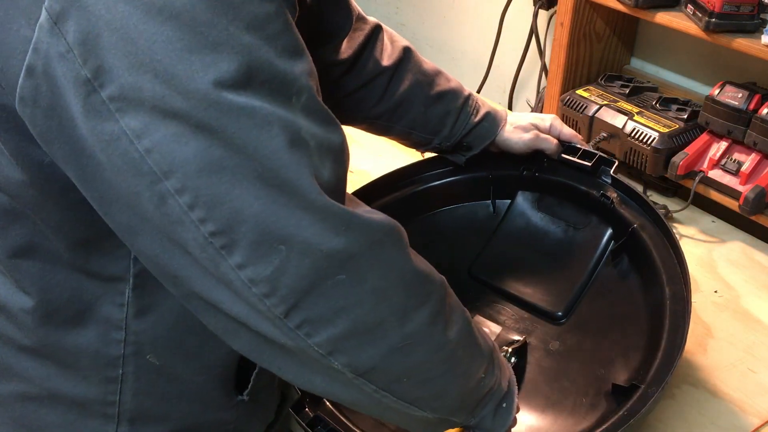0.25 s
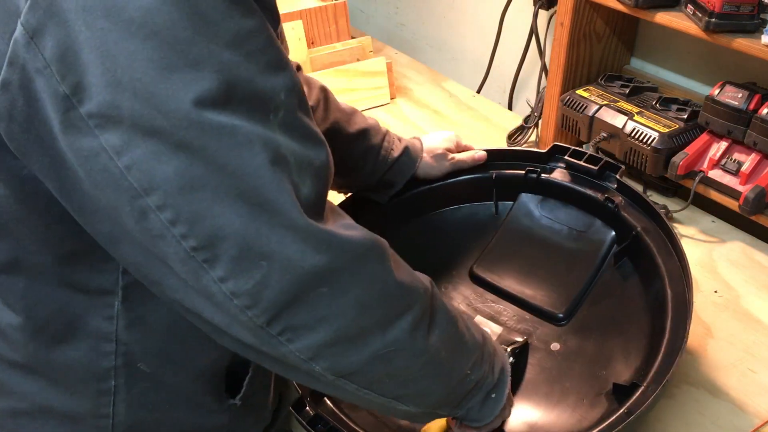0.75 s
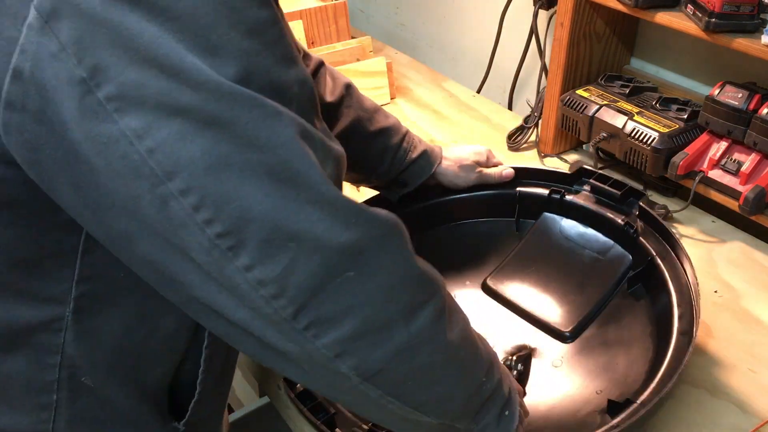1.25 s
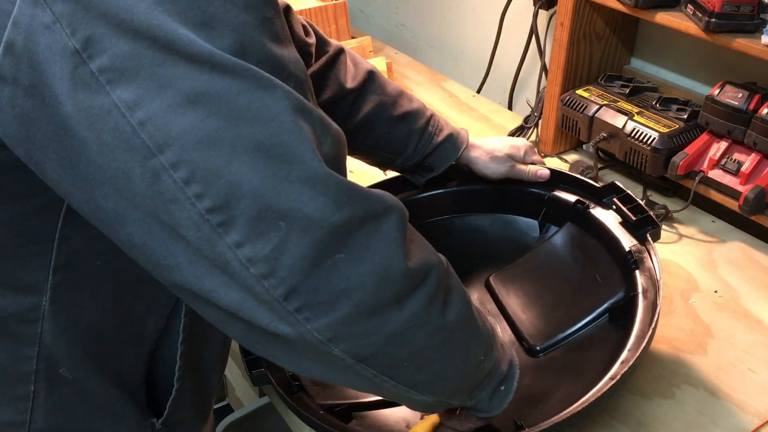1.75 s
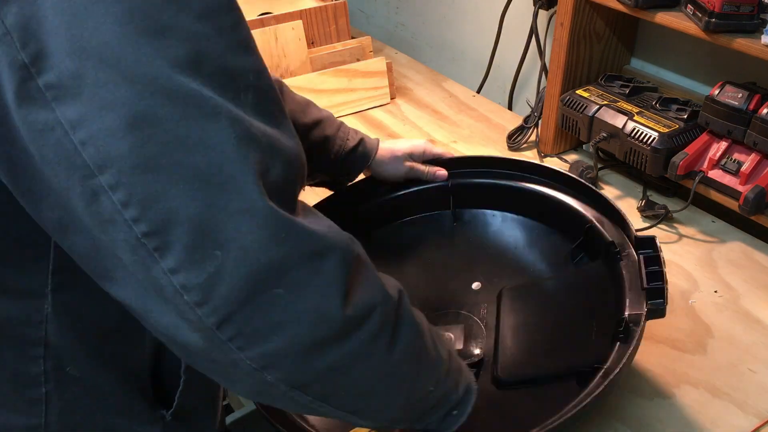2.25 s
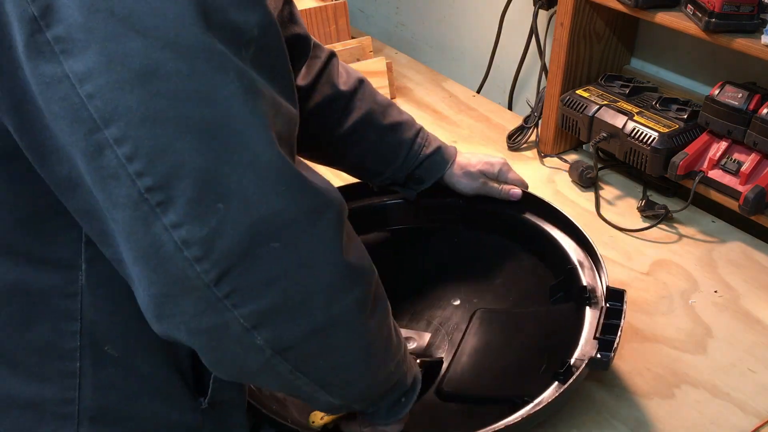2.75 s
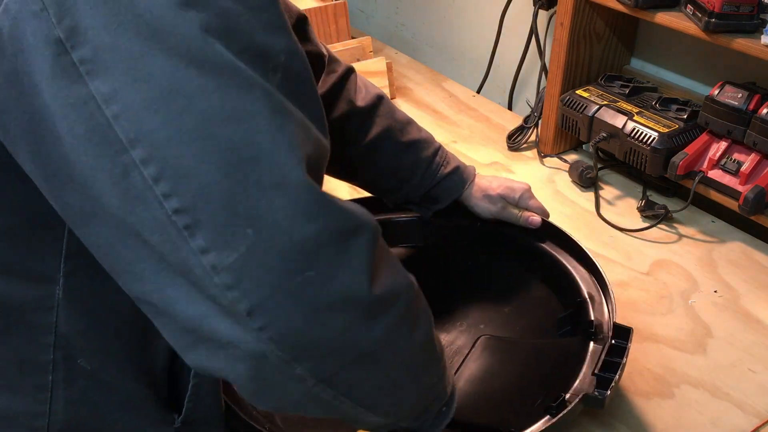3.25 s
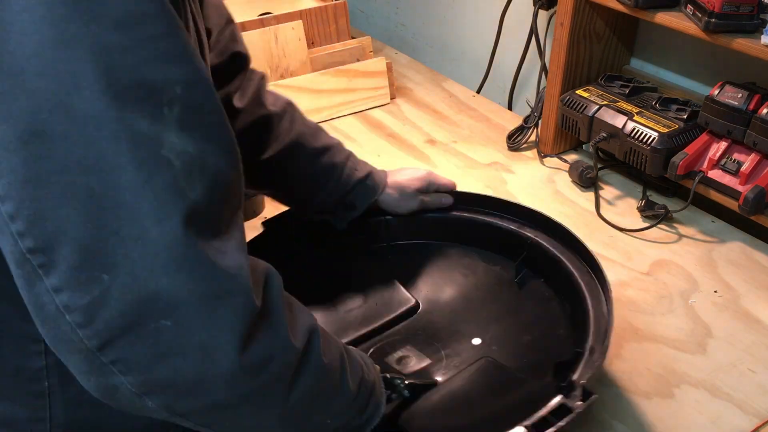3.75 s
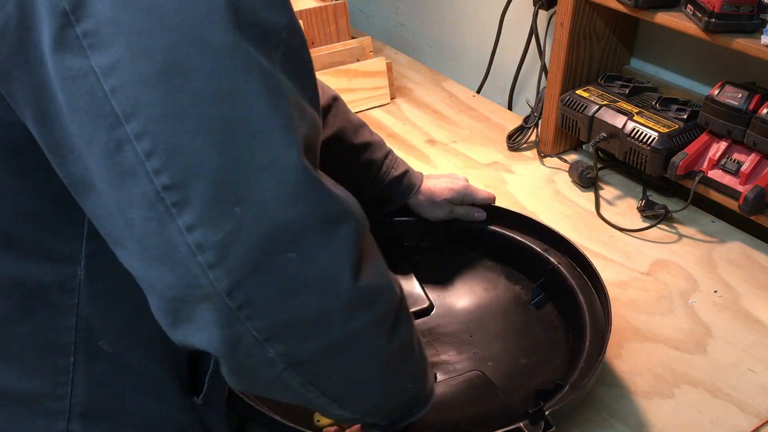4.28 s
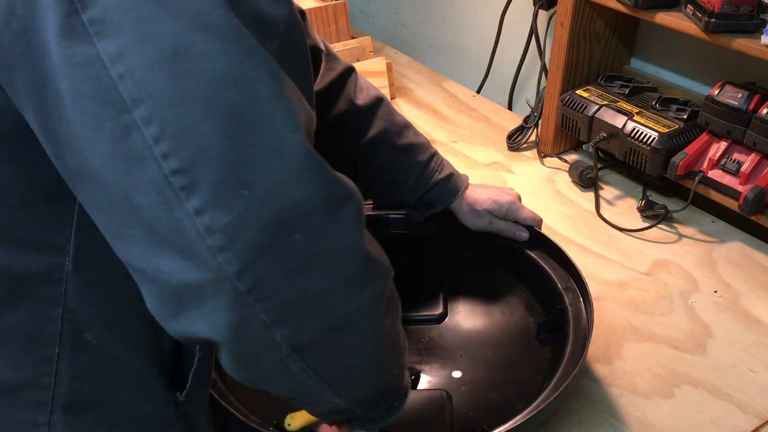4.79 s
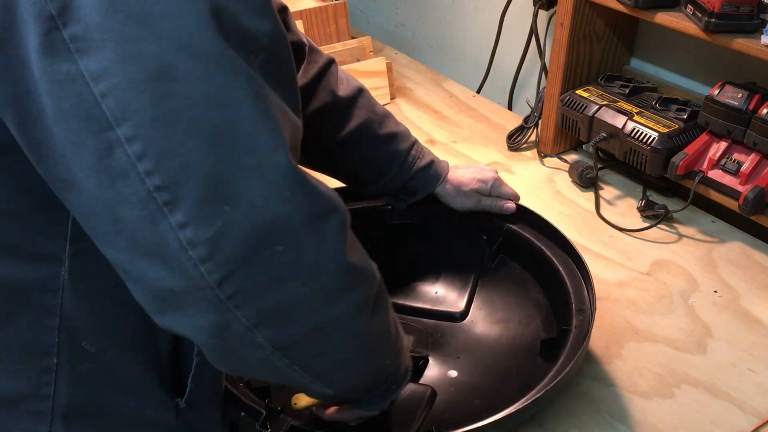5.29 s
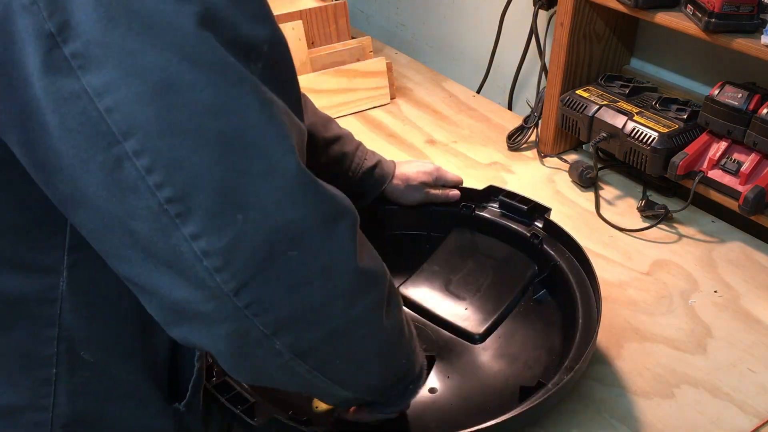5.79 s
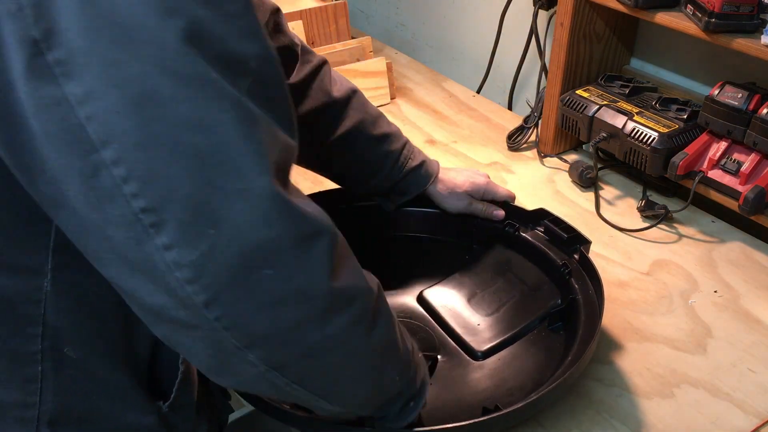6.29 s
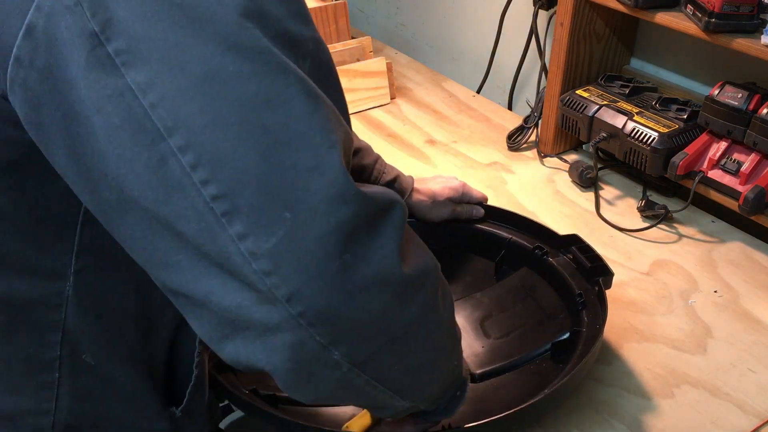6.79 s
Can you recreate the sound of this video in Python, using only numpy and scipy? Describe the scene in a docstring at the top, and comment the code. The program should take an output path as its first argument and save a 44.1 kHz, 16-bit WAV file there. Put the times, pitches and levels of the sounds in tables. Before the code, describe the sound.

In a quiet workshop with a low hum, a hand rubs and knocks a big hollow plastic lid on a bench for about a second. Then everything jumps to fast motion: the room hum rises in pitch, and metal snips bite through plastic in rapid, uneven cracks and ticks with gritty scraping between and dull, short lid booms. Close, dry microphone with little bass.

```python
"""A workshop hums while a hand drags and knocks a large plastic lid on a plywood bench.
Then the playback jumps to fast motion: room noise and hum are read faster, so they rise in pitch.
Metal snips bite through the lid: bursts of noise ring blades and plastic, and a late push booms the lid.
Between bites, grainy noise grinds and scrapes, with small ticks and faint crackles.
The pitches of the cutting rings are written as heard in fast motion."""
import sys
import numpy as np
from scipy import signal
from scipy.fft import rfft, irfft, next_fast_len
from scipy.io import wavfile
from scipy.ndimage import uniform_filter1d

SR = 44100
rng = np.random.default_rng(int(sys.argv[2]) if len(sys.argv) > 2 else 0)


def transcribe(signal):
    """Save signal, clipped to [-1, 1], as a 16-bit WAV file at the path in sys.argv[1]."""
    frames = np.atleast_2d(signal).T
    limited = np.clip(frames, -1, 1)
    pcm = np.round(limited * 32767).astype(np.int16)
    wavfile.write(sys.argv[1], SR, pcm)


def makeup_ratio(level_db):
    """Linear amplitude ratio for a level in decibels (20 dB per factor of ten)."""
    decades = np.asarray(level_db, float) / 20
    return 10 ** decades


N = 310023  # length in samples

FAST_FROM_S, FAST_SPEED = 1.128, 5.73  # when fast motion starts, and how many times faster it is
STRAIN_S = 0.003  # faint crackle before the cut lets go

# Rubbing sound of skin and sleeve on plastic: pitch_hz [Hz], level_db [dB per Hz, relative]
SLIDE_HISS = [(1180, -6), (2000, 1.5), (3840, 5.5), (5100, 2.5), (6880, -1.5), (9000, -0.5), (12000, -1),
              (15900, -7), (16500, -53)]
# Rubbing and knocking as heard through the lid body: pitch_hz [Hz], level_db [dB per Hz, relative]
LID_BODY = [(150, -34), (300, 16.5), (450, 8.5), (1000, 4), (1600, 1.5), (2500, -10), (4000, -67)]
# Bites that boom the whole lid, with levels ahead of the microphone: start_s [s], crack_db [dB peak, lower half],
# ring_hz [Hz, strongest ring before small shifts], tear_ms [ms], plate_db [dB peak], boom_db [dB peak]
BITES = [(1.1508, -32.5, 4350, 4.4, -33, -44), (1.2121, -47.5, 2540, 3.7, -50, -41),
         (1.3185, -27, 3230, 2.8, -37.5, -36.5), (1.3489, -39, 3120, 4.6, -52, -39),
         (1.522, -28.5, 5900, 0.96, -39, -30.5), (1.735, -35, 5970, 4, -37, -36),
         (1.7621, -38, 2460, 4.2, -35, -40.5), (1.8957, -36, 6100, 4.5, -36, -36.5),
         (2.2771, -38.5, 5970, 3.2, -41, -35), (2.4842, -30.5, 2880, 2.7, -31.5, -33.5),
         (2.85, -25.5, 3170, 2.4, -31.5, -29.5), (3.0228, -43, 3150, 3.9, -35.5, -44),
         (3.1396, -25, 2830, 1.65, -28.5, -34), (3.1877, -24, 4100, 4.1, -23.5, -24.5),
         (3.4229, -17, 3300, 2.3, -29, -20), (3.739, -31, 4020, 5.5, -35.5, -29),
         (3.772, -37.5, 3610, 7.4, -43, -40), (3.8494, -39.5, 4860, 5.2, -38, -45),
         (4.1137, -32, 2230, 5.3, -31.5, -30), (4.3101, -22.5, 4040, 2.6, -32.5, -23.5),
         (4.505, -26.5, 5420, 3.5, -34.5, -30), (4.794, -27.5, 2230, 3.4, -33.5, -30.5),
         (4.9507, -24, 6660, 3.54, -26.5, -24.5), (5.0107, -41, 2420, 4.1, -46, -38),
         (5.1786, -43, 5100, 6, -43.5, -35.5), (5.3101, -29, 3880, 4.7, -27, -21),
         (5.421, -37, 4270, 1.7, -50, -26.5), (5.5533, -32, 6900, 4.2, -35, -27.5),
         (5.677, -34, 5340, 5, -36, -29), (5.897, -36, 4020, 2.1, -34, -30.5),
         (6.02, -34, 7650, 4.6, -33.5, -27), (6.195, -38, 3050, 5.8, -39, -27.5),
         (6.3329, -34.5, 5600, 2.1, -37, -27.5), (6.9428, -37.5, 3440, 5.2, -43.5, -33.5)]


def evened(x):
    """Scales a sound to an rms of one."""
    return x / np.sqrt(np.mean(x ** 2) + 1e-20)


def peaked(x, db):
    """Scales the loudest 1.5 ms to a level, counted as the peak of an equally strong sine."""
    loudest_power = uniform_filter1d(x ** 2, size=66).max()
    return makeup_ratio(db) * x / np.sqrt(2 * loudest_power + 1e-24)


def read(points, hz):
    """Reads a spectrum between its points, on a log-frequency axis."""
    f, value = np.transpose(points)
    return np.interp(np.log(hz + 1), np.log(f + 1), value)


def add(mix, s, sound):
    """Mixes a sound in at a time in seconds."""
    part = mix[round(s * SR):][:len(sound)]
    part += sound[:len(part)]


def coloured(x, points, speed=1):
    """Filters by a spectrum whose frequencies are multiplied by speed."""
    size = next_fast_len(len(x) + 2048)
    hz = np.fft.rfftfreq(size, 1 / SR)
    gain = makeup_ratio(read(points, hz / speed))
    return irfft(rfft(x, size) * gain, size)[:len(x)]


def rung(drive, modes, detune, spread_db):
    """A short push rings a set of modes; each blow lands elsewhere, so tunings and levels shift."""
    hz, db, t60 = np.transpose(modes)[:, :, None]
    count = len(modes)
    t = np.arange(len(drive)) / SR
    fading = makeup_ratio(db + spread_db[:count, None] - 60 * t / t60)
    ring = fading * np.sin(2 * np.pi * hz * detune[:count, None] * t)
    return signal.fftconvolve(drive, ring.sum(0))[:len(drive)]


def room():
    """Air noise and wavering machine tones, all read faster after the jump."""
    # Room air at normal speed: pitch_hz [Hz], level_db [dB per Hz, relative]
    air_spectrum = [(5, -27), (25, -19.5), (40, -4.5), (55, -1), (75, 3), (100, -16.5), (150, -13.5),
                    (210, -6.5), (260, -12.5), (400, -17), (550, -22.5), (1200, -30.5), (2800, -39),
                    (8000, -43.5), (16000, -49)]
    # Machine tones at normal speed: pitch_hz [Hz], level_db [dB, before the waver adds about 2 dB],
    # width_hz [Hz, wider wavers faster]
    hum_tones = [(51, -68, 5), (59.2, -68, 2), (119.4, -76, 1.5), (209.8, -67, .8)]
    slow_db, fast_db, jump_s = -58.5, -61, 0.00977  # air rms levels, length of the crossfade
    fast = np.clip((np.arange(N) / SR - FAST_FROM_S) / jump_s, 0, 1)
    speed = np.where(fast > 0.5, FAST_SPEED, 1.0)
    air = rng.standard_normal((2, N))
    slow_air = makeup_ratio(slow_db) * evened(coloured(air[0], air_spectrum))
    fast_air = makeup_ratio(fast_db) * evened(coloured(air[1], air_spectrum, FAST_SPEED))
    out = (1 - fast) * slow_air + fast * fast_air
    room_s = np.cumsum(speed) / SR  # time that passes in the room
    steps = np.arange(0, 40, 0.01)
    for hz, db, width in hum_tones:
        smoothing = max(round(40 / width), 1)
        wavers = [evened(uniform_filter1d(v, smoothing)) for v in rng.standard_normal((2, len(steps)))]
        a, b = (np.interp(room_s, steps, waver) for waver in wavers)
        phase = 2 * np.pi * hz * room_s
        out += makeup_ratio(db) * ((1.69 + 0.33 * a) * np.cos(phase) + 0.44 * b * np.sin(phase))
    return out


def friction(s, hiss_db, body_db, colour, patch_db, clump_db, grains_per_s, grain_share):
    """Stick-slip grains over a hiss whose colour shifts in patches, heard bare and through the lid."""
    t = np.arange(N) / SR
    size = makeup_ratio(3.5 * np.minimum(rng.exponential(1, N), 2.5))
    grains = (rng.random(N) < grains_per_s / SR) * size * rng.choice([-1.0, 1.0], N)
    rough = grain_share * evened(grains) + rng.standard_normal(N)
    z = signal.stft(rough, nperseg=256)[2]
    # Patches vary over pitch and time; clumps vary over time alone.
    patches, clumps = rng.standard_normal(z.shape), rng.standard_normal(z.shape[1])
    patches = uniform_filter1d(patches, size=9, axis=0)
    patches = evened(uniform_filter1d(patches, size=4, axis=1))
    clumps = evened(uniform_filter1d(clumps, size=3))
    uneven = z * makeup_ratio(patch_db * patches + clump_db * clumps)
    drive = signal.istft(uneven, nperseg=256)[1][:N]
    hiss = makeup_ratio(np.interp(t, s, hiss_db)) * evened(coloured(drive, colour))
    body = makeup_ratio(np.interp(t, s, body_db)) * evened(coloured(drive, LID_BODY))
    return (hiss + body) * (t > s[0]) * (t < s[-1])


def hand_slide():
    """The hand drags the lid at normal speed: rubbing hiss, with the lid body a little louder."""
    # Loudness of the drag: start_s [s], hiss_db [dB]
    slide_levels = [(0.2, -81), (0.44, -74), (0.484, -66), (0.541, -70.5), (0.605, -53.5), (0.702, -61),
                    (0.756, -48.5), (0.8, -66), (0.835, -56.5), (0.902, -71.5), (1.13, -74.5)]
    s, hiss_db = np.transpose(slide_levels)
    return friction(s, hiss_db, hiss_db + 2.5, SLIDE_HISS, patch_db=1.0, clump_db=0.5,
                    grains_per_s=700, grain_share=0.74)


def knock(click_db, body_db, body_hz, chance):
    """A fingertip click over a dull, noisy ring of the lid."""
    t = np.arange(4000) / SR
    fading = makeup_ratio(-60 * t / 0.011) + makeup_ratio(-9 - 60 * t / 0.075)
    touch = chance * (1 - np.exp(-t / 0.00051)) * fading
    # Rings of the knocked lid: pitch [Hz], level [dB], time to fall 60 dB [s]
    modes = [(body_hz, 0, 0.03), (205, 3, 0.1), (body_hz * 1.42, -5, 0.03), (body_hz * 2.4, -6, 0.02)]
    ring = evened(rung(touch, modes, np.ones(4), np.zeros(4)))
    body = ring + 0.77 * evened(coloured(touch, LID_BODY))
    return peaked(coloured(touch, SLIDE_HISS), click_db) + peaked(body, body_db)


def grinding_db(t):
    """Level of the grinding: one rise and fade after each bite and for each scrape."""
    # Blades pushed on along the cut between bites: loudest_s [s], hiss_db [dB],
    # rise_s [s], fade_s [s]
    scrapes = [(1.365, -42.5, 0.037, 0.026), (1.95, -52.5, 0.034, 0.17), (2.02, -51.5, .08, 0.021),
               (2.33, -68, 0.054, 0.092), (2.56, -49.5, 0.093, 0.07), (2.65, -54, 0.05, 0.056),
               (2.692, -55, .03, .03), (2.76, -67, 0.12, 0.041), (2.92, -67, .1, 0.24),
               (3.235, -60, 0.027, 0.034), (3.51, -55.5, 0.11, 0.075), (3.78, -56, 0.066, 0.39),
               (3.95, -61.5, 0.063, 0.13), (4.13, -57, .03, 0.16), (4.595, -44, 0.07, 0.028),
               (4.67, -61.5, 0.087, 0.034), (5.0, -50.5, 0.1, 0.07), (5.075, -55, .15, 0.016),
               (5.2, -61, 0.045, 0.18), (5.48, -60.5, 0.18, 0.1), (5.61, -54, 0.073, 0.046),
               (5.7, -56, 0.074, 0.21), (5.904, -53, .05, 0.048), (6.04, -57, 0.083, 0.16),
               (6.345, -57, .04, 0.049), (6.47, -56.5, 0.15, 0.047), (6.565, -57, 0.019, .05),
               (6.61, -59, 0.019, 0.044), (6.79, -58, 0.064, 0.19), (6.99, -61, 0.24, 0.28)]
    after_db, crack_share = -63.5, 0.43  # level after a -25 dB crack, dB added per dB of crack
    delay_s, rise_s, fade_s = 0.035, 0.028, 0.13
    span_db, rest_db = 22, -73.5  # rise and fade times cover span_db; rest_db always remains
    follows = [(s + delay_s, after_db + crack_share * (crack_db + 25), rise_s, fade_s)
               for s, crack_db, *_ in BITES]
    s, db, rise_s, fade_s = np.transpose(follows + scrapes)[:, :, None]
    shape_db = db + span_db * np.minimum((t - s) / rise_s, (s - t) / fade_s)
    power = makeup_ratio(rest_db) ** 2 + (makeup_ratio(shape_db) ** 2).sum(0)
    return 10 * np.log10(power)


def rubbing():
    """Blades grind through plastic in rough clumps; the lid body follows more weakly."""
    # Bare grinding of blades on plastic: pitch_hz [Hz], level_db [dB per Hz, relative]
    grind_hiss = [(1180, -11), (2000, 4), (3840, 4.5), (5100, 2.5), (7000, 3), (8800, -2), (10900, 0),
                  (13000, -5), (15900, -9), (16500, -51)]
    s = np.arange(FAST_FROM_S + 0.01, N / SR, 0.002)
    hiss_db = grinding_db(s)
    body_db = -64.5 + 0.31 * (hiss_db + 64.0)
    return friction(s, hiss_db, body_db, grind_hiss, patch_db=2.7, clump_db=3.76,
                    grains_per_s=900, grain_share=0.84)


def snap(bite_db, sizzle_db, plate_db, ring_hz, tear_ms, chance):
    """The plastic strains, then tears in a few milliseconds of noise; blades and plate ring briefly."""
    # Steel blades and cut edge: pitch_hz [Hz], level_db [dB, relative], t60_s [s to fall 60 dB]
    blade_modes = [(2630, -10.5, 0.066), (2880, -3.5, 0.039), (3423, 10, 0.0066), (3980, -4.5, 0.014),
                   (5270, -25.5, 0.0089), (6010, -7.5, 0.032), (5880, -7, 0.01), (7450, -5.5, 0.011),
                   (9100, -18, 0.01), (10700, -1, 0.012), (11060, -4.5, 0.0083), (12600, -8, 0.0095)]
    # Ringing of the lid near the cut: pitch_hz [Hz], level_db [dB, relative], t60_s [s to fall 60 dB]
    plate_modes = [(713, -5.5, 0.043), (962, -4, 0.058), (1276, -5, 0.038), (1578, 9, 0.019),
                   (1920, 3, 0.0082), (2206, 11.5, 0.0059)]
    # Unpitched part of the plate: pitch_hz [Hz], level_db [dB per Hz, relative]
    plate_slap = [(420, -7), (700, -4.5), (1500, 2.5), (2400, -3.5), (3600, -40.5)]
    # Lower half of a crack: pitch_hz [Hz], level_db [dB per Hz, relative]
    crack_low = [(1300, -27.5), (2200, -5.5), (3200, -1), (4200, 3.5), (5800, -4.5), (7500, -50.5)]
    # Upper half of a crack: pitch_hz [Hz], level_db [dB per Hz, relative]
    crack_high = [(4500, -36), (6300, 2.5), (9500, -1.5), (11500, -4), (15500, -6.5), (16600, -62)]
    t = np.arange(3000) / SR - STRAIN_S  # zero where the cut lets go
    noise = chance[:3000]
    detune, spread_db = 1 + 0.015 * chance[3000:3020], 2 * chance[3020:3040]
    after = np.maximum(t, 0)
    strain = makeup_ratio(-28 + 13400 * t) * (t < 0.001)
    rip_rise = 1 - np.exp(-after / (0.00002 * tear_ms ** 2))
    rip = rip_rise * makeup_ratio(-9.5 * (after / (tear_ms / 1000)) ** 0.82)
    tear = noise * abs(noise) ** 0.4 * (strain + rip)  # the power makes the noise spikier
    # Near walls and bench throw back a short tail.
    tail = noise[::-1] * (1 - np.exp(-after / 0.0028)) * makeup_ratio(-8.5 - 60 * after / 0.037)
    burst = tear + tail
    blade_ring = rung(tear, blade_modes + [(ring_hz, 8, 0.016)], detune, spread_db)
    crack = evened(burst) + 0.36 * evened(blade_ring)
    plate_ring = rung(burst, plate_modes, detune[::-1], spread_db[::-1])
    plate = evened(plate_ring) + 0.65 * evened(coloured(burst, plate_slap))
    out = peaked(coloured(crack, crack_low), bite_db)
    out = out + peaked(coloured(crack, crack_high), sizzle_db)
    return out + peaked(plate, plate_db)


def thump(db, lift_db, chance):
    """The lid follows the bite a little late and rings on its lowest modes; the hand damps it more or less."""
    # Lowest lid modes: pitch_hz [Hz, before small shifts], level_db [dB, before lift and chance],
    # t60_s [s to fall 60 dB, before the hand's damping]
    lid_modes = [(302.7, -1, 0.16), (356, -12, 0.11), (373.3, 11, 0.058), (420, 5.5, 0.074)]
    t = np.arange(6000) / SR
    push = np.exp(-((t - 0.0038) / 0.0008) ** 2)
    lift = np.arange(len(lid_modes)).clip(0, 2) / 2  # none for the lowest mode, half for the next, then all
    damping = 1.2 ** chance[8]
    held = [(hz, level_db, t60 * damping) for hz, level_db, t60 in lid_modes]
    ring = rung(push, held, 1 + 0.018 * chance[:4], lift * lift_db + 1.5 * chance[4:8])
    return peaked(ring, db)


def crackles():
    """Faint short ticks at chance moments, as loud as the grinding allows."""
    per_s, spread_db = 11, 4
    over_db, top_db = 10, -54  # dB over the grinding, and the highest level before the chance spread
    fast_s = N / SR - FAST_FROM_S
    when, size, ring, tear = rng.random((round(per_s * fast_s), 4)).T
    s = FAST_FROM_S + 0.05 + when * (fast_s - 0.1)
    db = np.minimum(grinding_db(s) + over_db, top_db) + spread_db * (2 * size - 1)
    ring_hz, tear_ms = 3000 * 3 ** ring, 1.2 + 2.5 * tear
    return list(zip(s, db, ring_hz, tear_ms, db - 12))


def snipping():
    """Grinding, lid thumps and snaps in fast motion, through a microphone that rolls off the bass."""
    # The cut edge cracks or the blades tick without moving the whole lid, ahead of the microphone:
    # start_s [s], crack_db [dB peak, lower half], ring_hz [Hz, before small shifts],
    # tear_ms [ms], plate_db [dB peak]
    ticks = [(1.1859, -35, 2540, 6.7, -43.5), (1.2522, -31, 3320, 2.8, -46), (1.2638, -47, 7200, 2.1, -62),
             (1.5505, -36.5, 2440, 3.4, -36.5), (1.617, -50.5, 2280, 5, -63),
             (1.837, -50.5, 7500, 1.8, -56), (1.925, -34.5, 2630, 0.88, -39),
             (1.9873, -23.5, 4315, 4.5, -42), (2.063, -53, 2780, 5.3, -44.5),
             (2.306, -39.5, 2470, 0.91, -48), (2.4556, -47, 3220, 2.6, -55), (2.5132, -33, 2700, 2.8, -37),
             (2.5953, -59, 3060, 4, -45.5), (2.633, -41, 3220, 1.3, -50), (2.8868, -44.5, 4400, 4.6, -54),
             (2.926, -58, 7000, 2, -62), (2.96, -56, 7000, 2.5, -60), (2.9745, -50, 3210, 3.8, -48),
             (3.2184, -41, 2700, 2.2, -44), (3.282, -53, 3280, 5.4, -43), (3.457, -42, 2630, 1.5, -42.5),
             (3.6064, -41, 4060, 0.94, -46.5), (3.656, -41, 4400, 1.8, -45.5),
             (3.8147, -39, 2250, 2.8, -37.5), (3.897, -62, 7500, 2, -54), (3.937, -55, 7540, 9.1, -49),
             (3.9535, -49.5, 6400, 3.1, -44), (4.0727, -49, 3670, 5.5, -53), (4.1016, -57, 7600, 2.1, -55),
             (4.1413, -46, 3520, 2.5, -50), (4.2004, -50, 4050, 7.9, -49), (4.224, -50.5, 4900, 2.1, -65),
             (4.2971, -50.5, 6920, 1.6, -67), (4.3507, -50, 5000, 5.3, -47), (4.442, -51, 5940, 2.8, -54),
             (4.461, -46.5, 8300, 2.2, -63), (4.5538, -44.5, 3550, 2.9, -53),
             (4.5726, -53, 2210, 4.5, -42.5), (4.6018, -38, 7160, 3.7, -39), (4.6305, -49, 2900, 4.3, -54),
             (4.6572, -47.5, 4900, 8.5, -46.5), (4.6763, -47, 6420, 3.6, -64),
             (4.8326, -40, 6400, 2.4, -38.5), (4.851, -45.5, 3900, 4.1, -55), (4.869, -48, 6260, 2.7, -53),
             (4.994, -43.5, 4740, 4.1, -39), (5.02, -43, 3520, 3.9, -38.5), (5.051, -45, 5040, 6, -40.5),
             (5.072, -40, 3850, 4, -34.5), (5.1323, -49, 7160, 3.3, -58), (5.2131, -38.5, 3330, 3.6, -40.5),
             (5.2463, -49.5, 6400, 4.2, -57), (5.284, -43.5, 6200, 2.1, -50), (5.3468, -45, 2170, 8.4, -48),
             (5.4257, -34, 3130, 1.9, -40.5), (5.461, -50, 2260, 6.7, -46), (5.489, -48, 5070, 4.2, -66),
             (5.644, -52.5, 6030, 4.6, -55), (5.703, -48, 5320, 4.5, -51), (5.719, -41, 3050, 3.7, -49),
             (5.775, -56, 2180, 6.7, -43), (5.8058, -47, 3100, 4.6, -44), (6.0637, -50.5, 2370, 5.7, -42),
             (6.2065, -48, 3980, 2.9, -57), (6.23, -49, 2280, 3.1, -49), (6.2422, -43.5, 2250, 4.4, -43.5),
             (6.291, -51, 4000, 4.8, -58), (6.3058, -42.5, 4170, 3.9, -45), (6.3743, -43.5, 5240, 3.6, -61),
             (6.3878, -46.5, 2800, 5.9, -41), (6.4333, -44, 5400, 2.1, -44.5),
             (6.4501, -36.5, 3980, 2.2, -48), (6.4666, -36.5, 3410, 3.2, -38.5),
             (6.619, -57, 2300, 4.2, -45), (6.7658, -30.5, 4340, 2.8, -40), (6.8084, -44, 2340, 5, -44.5),
             (6.8456, -52, 3700, 3.5, -66), (6.9789, -39, 2320, 1.8, -41)]
    # Upper lid modes over the lowest, as the lid turns and tilts: start_s [s], lift_db [dB]
    boom_lift = [(1.1, -13), (2.0, -8), (2.85, -4.5), (3.1, 3), (3.45, 12), (3.9, -8), (4.5, 7.5), (4.9, 1),
                 (5.45, -10.5), (5.9, -1), (6.2, -6.5), (6.4, 8), (7.03, -8)]
    # Microphone bass roll-off: pitch_hz [Hz at normal speed], level_db [dB]
    low_cut = [(4, -22.5), (20, -24), (35, -20.5), (48, 2.5), (4000, -3.5)]
    cutting = rubbing()
    for (s, *_, boom_db), chance in zip(BITES, rng.standard_normal((len(BITES), 9))):
        lift_db = np.interp(s, *np.transpose(boom_lift))
        add(cutting, s, thump(boom_db, lift_db, chance))
    snaps = [row[:5] for row in BITES] + ticks + crackles()
    chances = rng.standard_normal((len(snaps), 3040))
    for (s, crack_db, ring_hz, tear_ms, plate_db), chance in zip(snaps, chances):
        # Higher and harder cracks are brighter: 4 dB per octave, 0.04 dB per dB.
        brighter_db = -2 + 4.0 * np.log2(ring_hz / 3920) + 0.04 * (crack_db + 39)
        sound = snap(crack_db, crack_db + brighter_db, plate_db, ring_hz, tear_ms, chance)
        add(cutting, s - STRAIN_S, sound)
    return coloured(cutting, low_cut, FAST_SPEED)


def scene():
    """Room, the lid shifted by hand, then the cutting in fast motion."""
    # Hand knocks on the lid: start_s [s], click_db [dB peak], body_db [dB peak], body_hz [Hz]
    hand_knocks = [(0.2593, -56, -75, 361), (0.408, -50, -71, 380), (0.4835, -55, -45.5, 500),
                   (0.5966, -44, -46, 420), (0.612, -58, -43, 420), (0.7226, -46, -32, 297),
                   (0.7574, -41, -32.5, 613), (0.818, -36, -39.5, 458), (0.838, -41.5, -44, 463),
                   (1.0062, -62, -50.5, 1170), (1.038, -51.5, -48, 350), (1.0579, -48.5, -51, 1250),
                   (1.113, -78, -50, 985)]
    mix = room() + hand_slide()
    for (s, *row), chance in zip(hand_knocks, rng.standard_normal((len(hand_knocks), 4000))):
        add(mix, s, knock(*row, chance))
    return (mix + snipping())[None]


def roll_off(x):
    """The treble ends steeply here."""
    return signal.sosfilt(signal.butter(12, 16970, fs=SR, output="sos"), x)


def record(dry):
    """Turns the finished mix into the sound that is saved."""
    return roll_off(dry)


dry = scene()
out = record(dry)
transcribe(out)
```